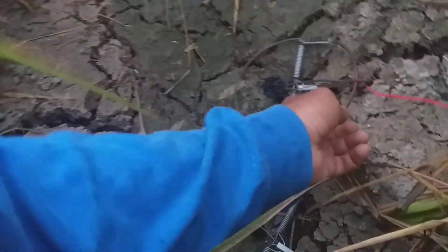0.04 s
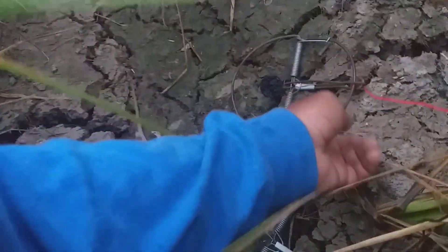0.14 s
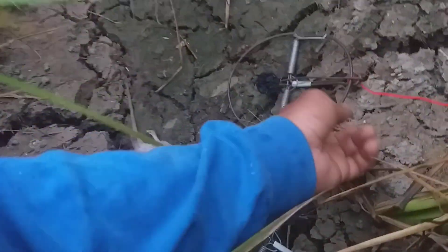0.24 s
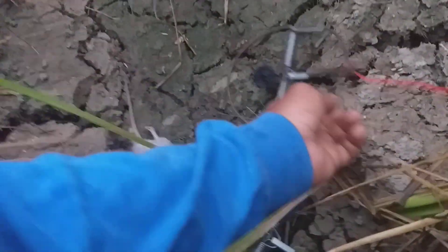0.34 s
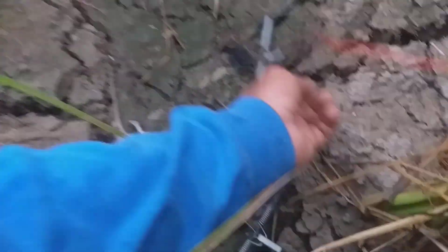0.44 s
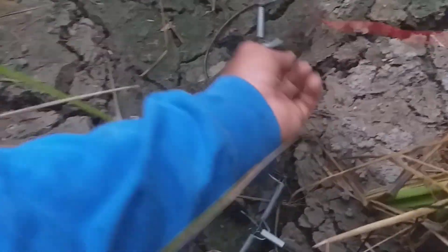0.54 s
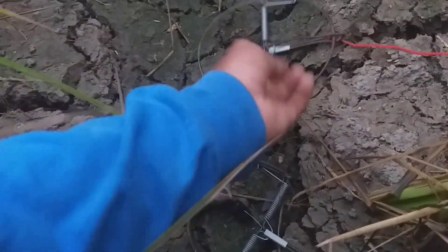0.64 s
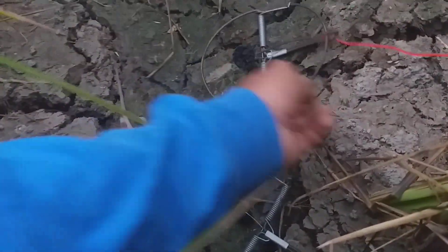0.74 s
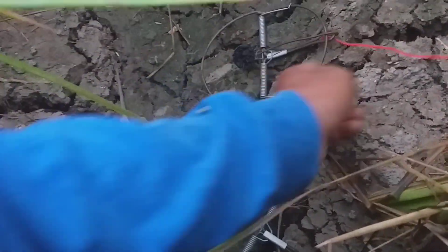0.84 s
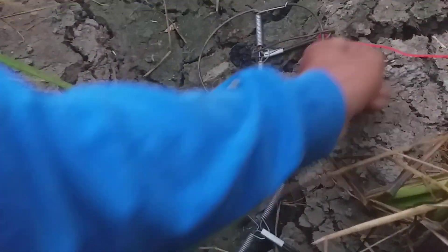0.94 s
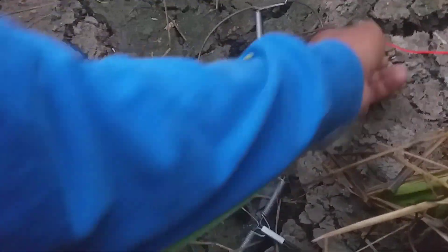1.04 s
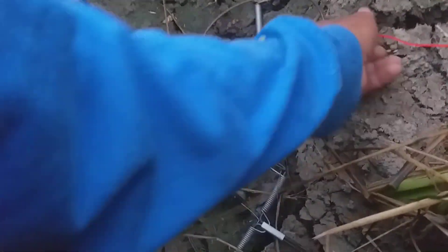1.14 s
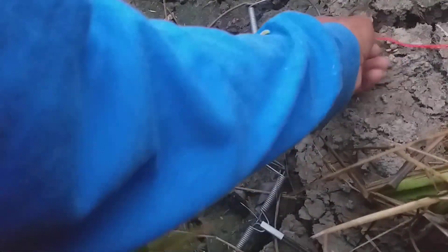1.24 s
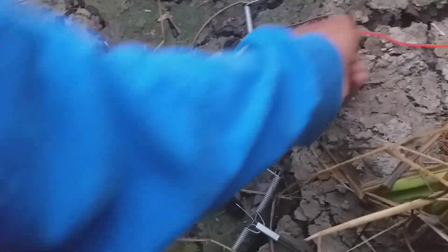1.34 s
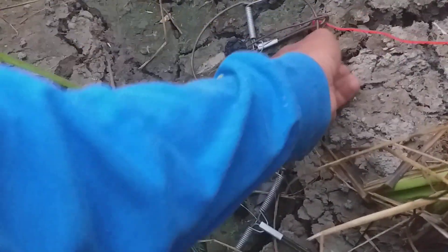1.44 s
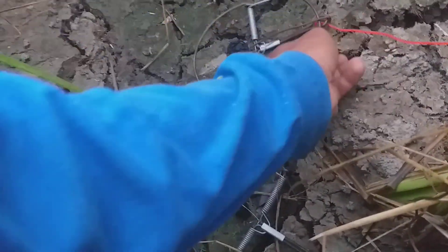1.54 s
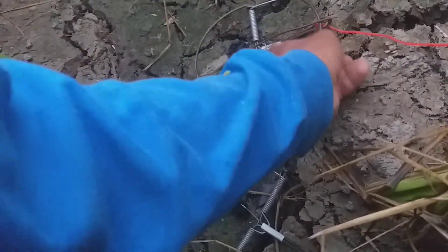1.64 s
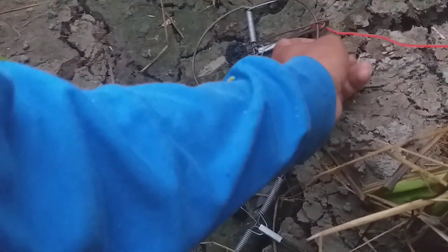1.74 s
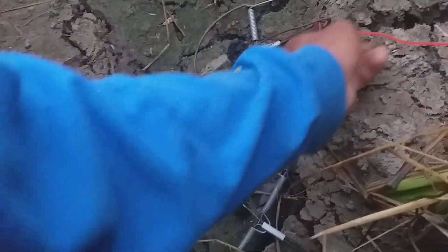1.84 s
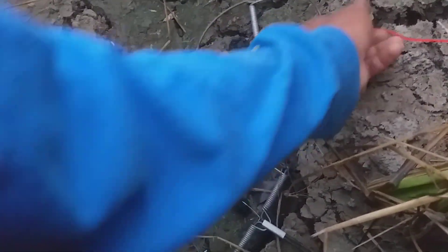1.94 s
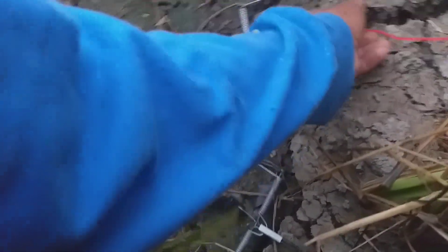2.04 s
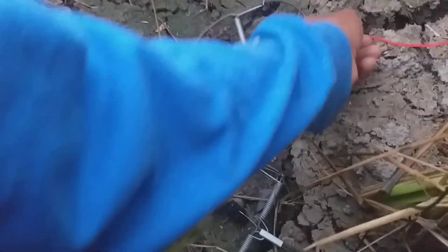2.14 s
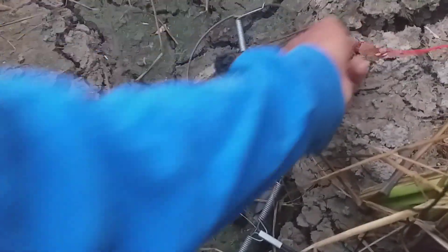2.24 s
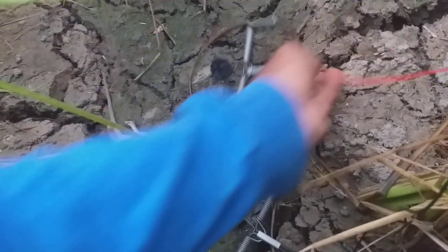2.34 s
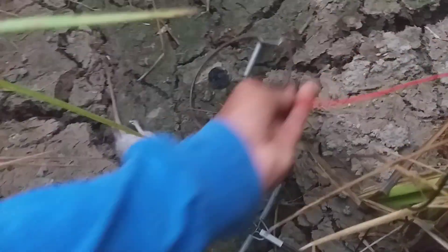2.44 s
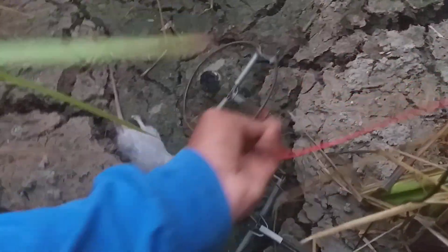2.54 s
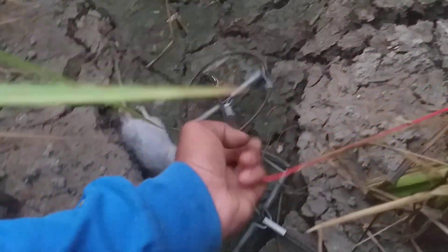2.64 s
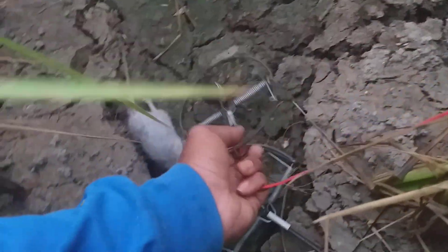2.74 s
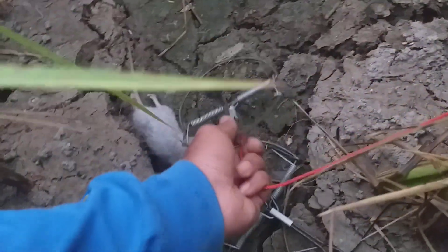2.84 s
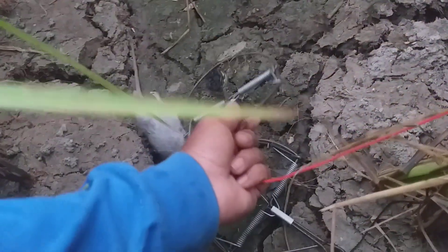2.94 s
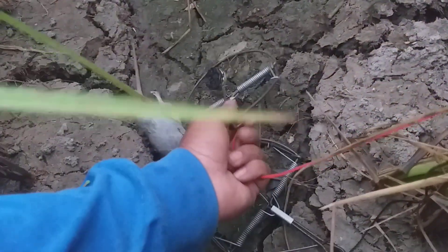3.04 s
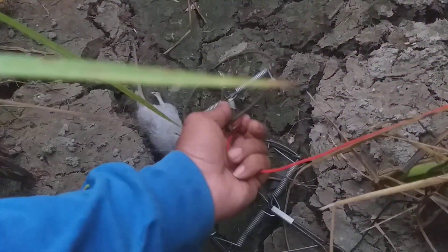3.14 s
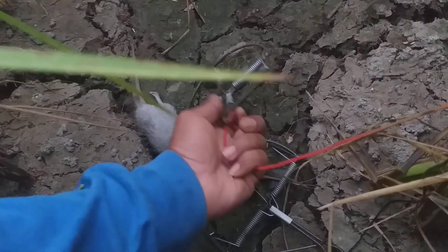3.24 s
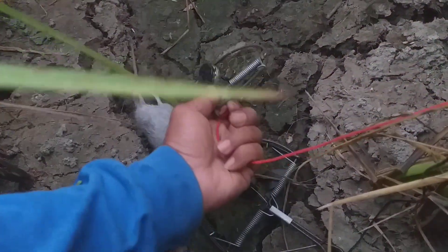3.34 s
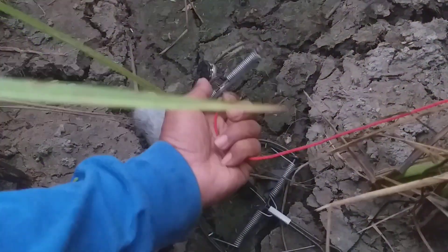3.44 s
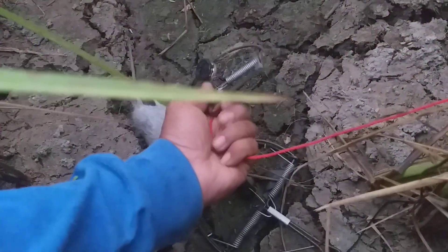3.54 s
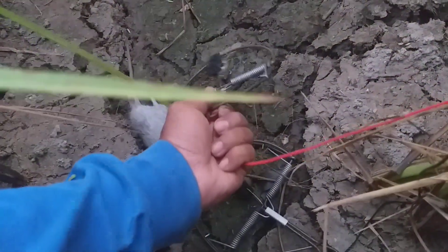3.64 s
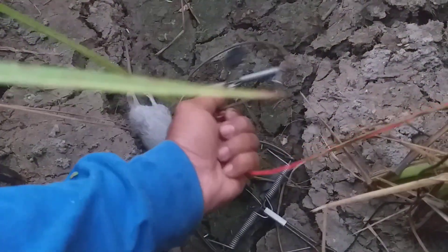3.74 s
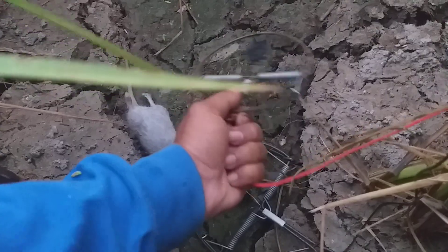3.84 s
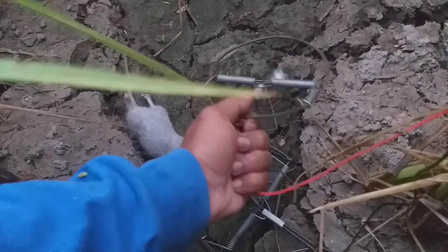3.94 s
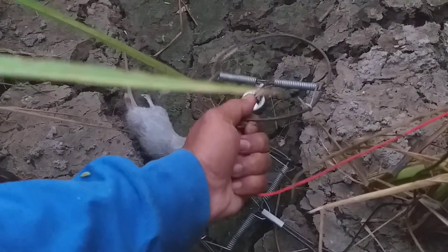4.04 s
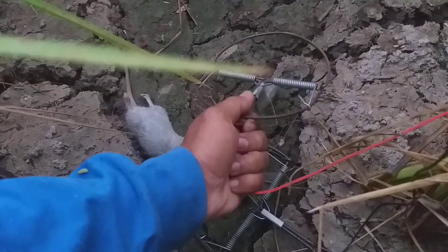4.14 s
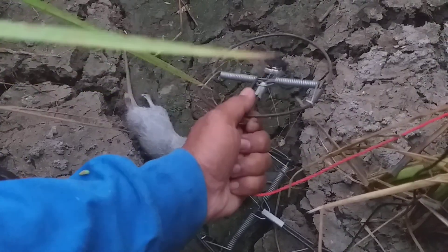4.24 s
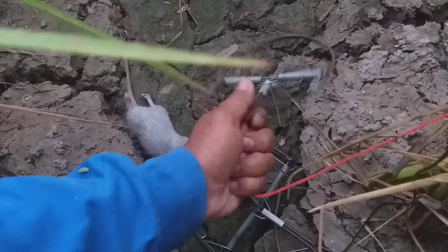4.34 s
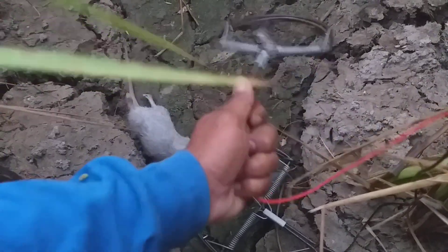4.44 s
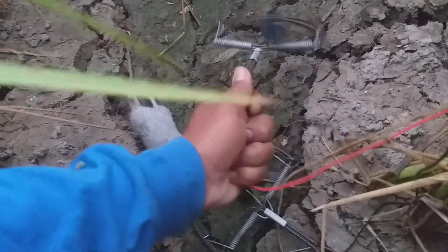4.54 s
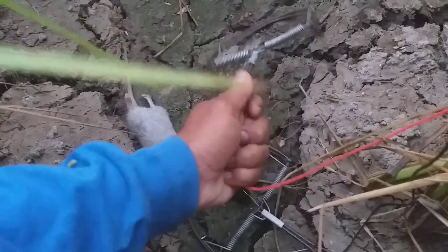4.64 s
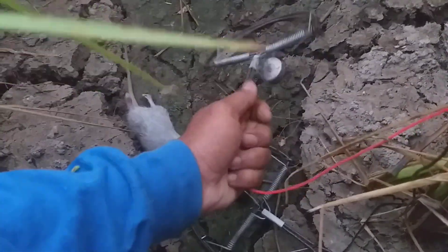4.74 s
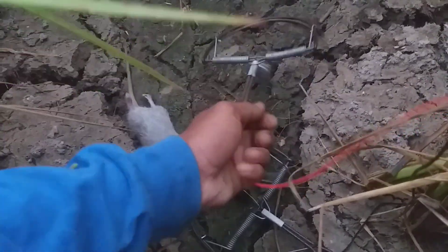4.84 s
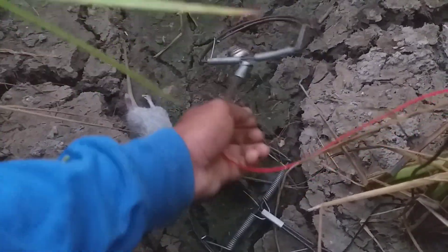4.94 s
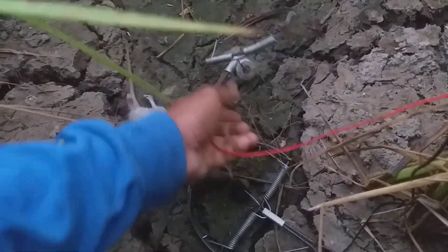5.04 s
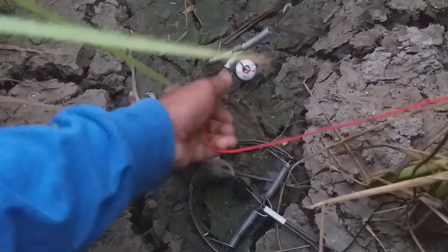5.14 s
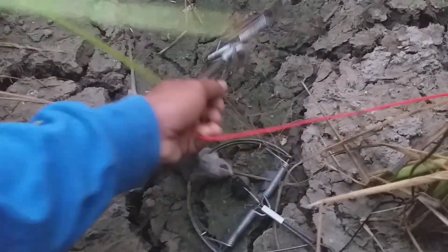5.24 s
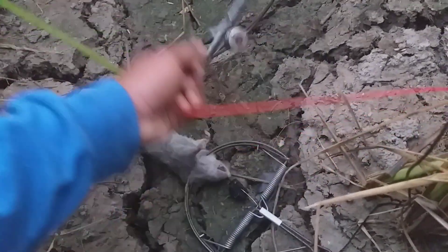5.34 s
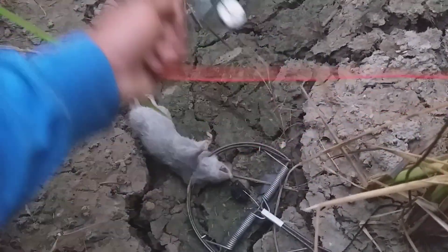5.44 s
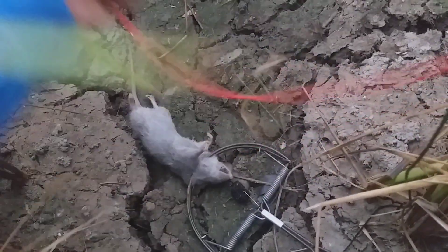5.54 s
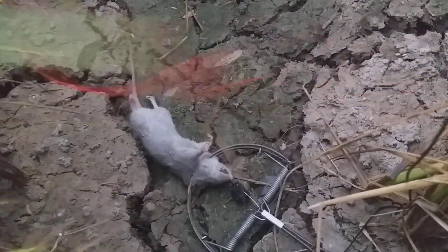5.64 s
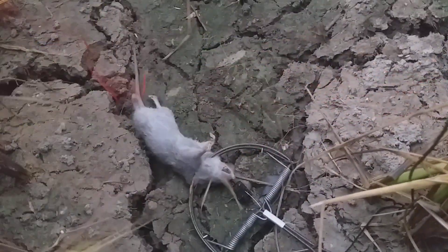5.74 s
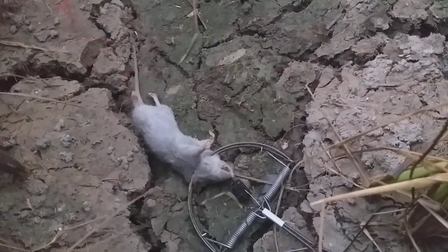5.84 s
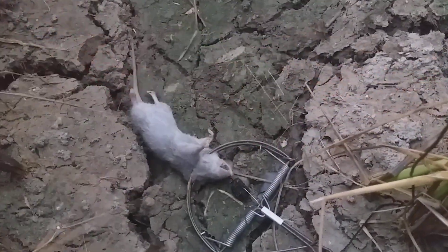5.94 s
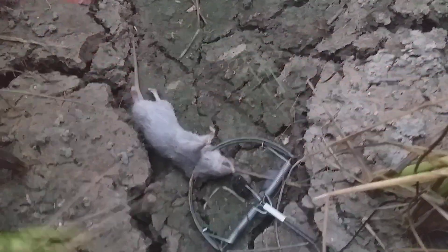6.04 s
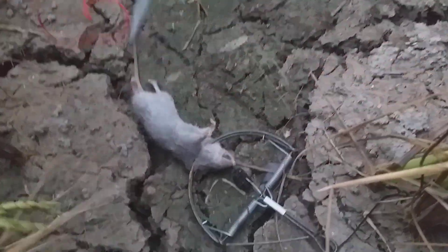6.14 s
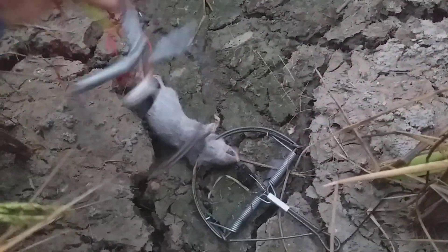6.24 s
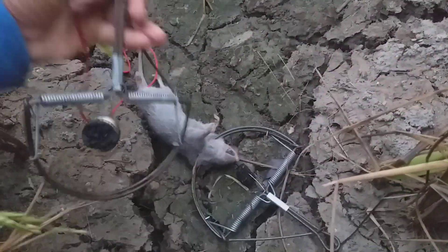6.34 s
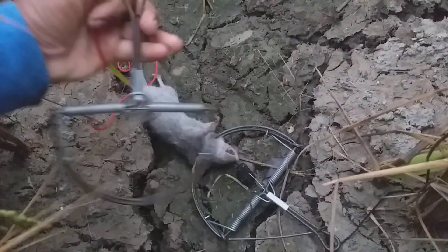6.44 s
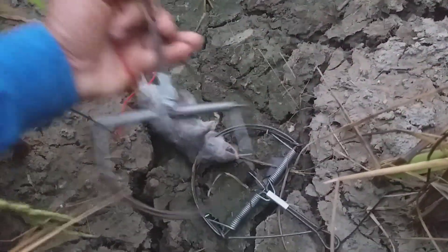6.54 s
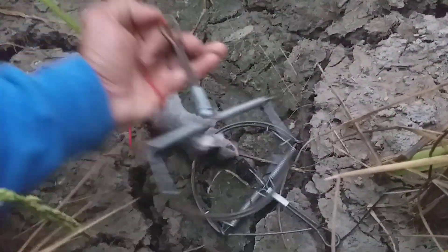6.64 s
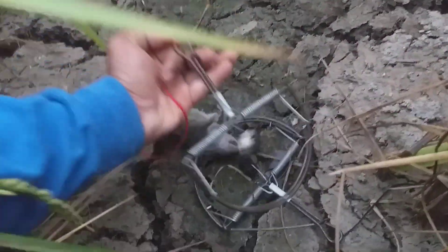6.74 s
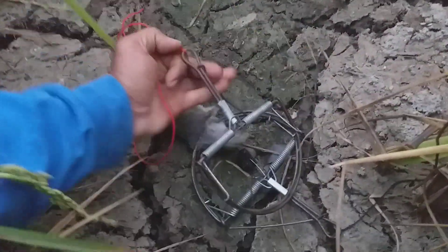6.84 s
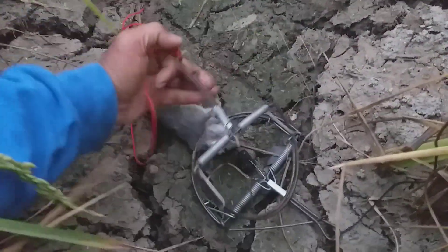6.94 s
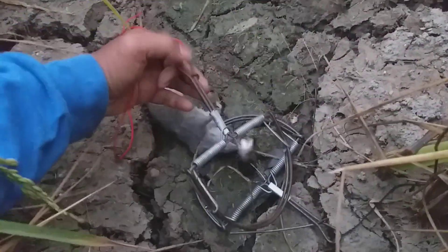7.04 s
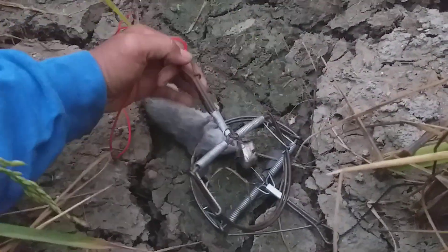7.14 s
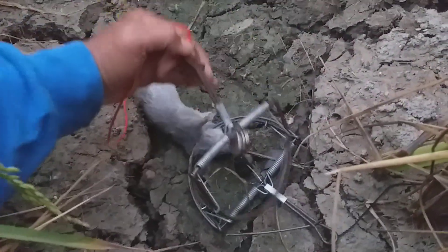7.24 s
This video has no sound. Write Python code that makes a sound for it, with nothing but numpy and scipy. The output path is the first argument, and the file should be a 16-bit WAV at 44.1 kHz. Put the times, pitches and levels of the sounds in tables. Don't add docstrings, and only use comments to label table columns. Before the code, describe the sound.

Sleeve and straw rustle over dry mud, a steel spring trap snaps once, sharp and loud, then rattles and clinks amid faint birds.

```python
import sys
import numpy as np
from scipy import signal
from scipy.fft import rfft, irfft, next_fast_len
from scipy.io import wavfile

SR = 44100
rng = np.random.default_rng(int(sys.argv[2]) if len(sys.argv) > 2 else 0)


def volts_from_decibels(level):
    exponent = np.asarray(level, float) / 20
    return 10 ** exponent


def output_pcm(signal):
    pcm = np.clip(np.atleast_2d(signal).T, -1, 1) * 32767
    wavfile.write(sys.argv[1], SR, np.round(pcm).astype(np.int16))


N = 321781
SINK_FIELD_DB = -7.5


def rms_one(x):
    return x / np.sqrt(np.mean(x ** 2) + 1e-20)


def in_time(rows):
    s, *columns = np.transpose(rows)
    return [np.interp(np.arange(N) / SR, s, c) for c in columns]


def coloured(x, points):
    size = next_fast_len(len(x), True)
    hz = np.maximum(np.arange(size // 2 + 1) * SR / size, 1)
    hz_at, db = np.transpose(points)
    weight = volts_from_decibels(np.interp(np.log(hz), np.log(hz_at), db))
    return irfft(rfft(x, size) * weight, size)[:len(x)]


def band(x, low_hz, high_hz):
    sos = signal.butter(2, [low_hz, min(high_hz, .45 * SR)], "band", fs=SR, output="sos")
    return signal.sosfilt(sos, x)


def steep_band(x, low_hz, high_hz):
    return band(band(x, low_hz, high_hz), low_hz, high_hz)


def split(x, edges_hz):
    size = next_fast_len(len(x), True)
    hz, spectrum = np.arange(size // 2 + 1) * SR / size, rfft(x, size)
    above = [1] + [1 / (1 + (edge / (hz + 1)) ** 16) for edge in edges_hz] + [0]
    return [irfft(spectrum * (a - b), size)[:len(x)] for a, b in zip(above, above[1:])]


def drift(rate_hz):
    r = np.exp(-2 * np.pi * rate_hz / SR)
    slow = signal.lfilter([1], [1, -2 * r, r * r], rng.standard_normal(N + SR))
    return rms_one(slow[SR:])


def ring(x, hz, t60):
    r, w = volts_from_decibels(-60 / (t60 * SR)), 2 * np.pi * hz / SR
    return signal.lfilter([0, np.sin(w)], [1, -2 * r * np.cos(w), r * r], x + 1e-18)


def add(out, at_s, piece):
    i = round(at_s * SR)
    out[i:i + len(piece)] += piece[:N - i]


def port_dip(x):
    sos = signal.butter(1, [8900, 11300], "bandstop", fs=SR, output="sos")
    return .25 * x + .75 * signal.sosfilt(sos, x)


def sink():
    at_s, attack_s, hold_s, release_s = 4.42, .3, 0.63, 0.71
    corners_s = np.cumsum([at_s, attack_s, hold_s, release_s])
    return in_time(np.c_[corners_s, [0, 1, 1, 0]])[0]


def open_field():
    # f/Hz, level/dB per Hz
    field_colour = [(150, -33), (250, 0.5), (710, -7), (845, -5.5), (2620, -11.5), (3230, -11), (6140, -13),
                    (7700, -17.5), (9830, -16.5), (14700, -8), (16000, -32.5)]
    field = coloured(rng.standard_normal(N), field_colour)
    level_db = -84.5 + SINK_FIELD_DB * sink() + 0.5 + 0.62 * drift(7)
    return field * volts_from_decibels(level_db) / np.std(band(field, 280, 900))


def rumble():
    # t/s, level/dB
    breeze = [(0, -68), (.35, -61.5), (.65, -68), (1.8, -66), (2.9, -68.5), (4.4, -67.5), (6., -67),
              (6.34, -59.5), (6.75, -67), (7.3, -67.5)]
    # f/Hz, level/dB per Hz
    breeze_colour = [(15, -50), (25, -23.5), (48, -5.5), (113, 1.5), (152, -2), (188, -12), (275, -23),
                     (330, -19.5), (430, -54.5), (730, -120)]
    # t/s, peak level/dB, f/Hz
    grip_shifts = [(6.097, -53, 104), (6.194, -46.5, 104), (6.26, -51.5, 86), (6.409, -48, 96.5),
                   (6.496, -53, 74.4), (6.617, -56.5, 121)]
    level_db = in_time(breeze)[0] - 8.5 * sink()
    out = volts_from_decibels(level_db + 2.2 * drift(11)) * rms_one(coloured(rng.standard_normal(N), breeze_colour))
    t = np.arange(round(.12 * SR)) / SR
    for s, db, hz in grip_shifts:
        envelope = (t / 0.013) * np.exp(1 - t / 0.01)
        add(out, s, volts_from_decibels(db + 3.5) * np.sin(2 * np.pi * hz * t) * envelope)
    return out


def cricket():
    # start t/s, end t/s, level/dB
    trill_bouts = [
        (.7, 1.35, -78),
        (1.3, 1.75, -93),
        (1.75, 2.1, -86.5),
        (2.9, 4.4, -96),
        (4.55, 4.95, -95),
        (5.6, 7.4, -88),
    ]
    carrier_hz, strokes_per_s, fall_hz, fade_s = 3220, 28., 260, 0.1
    beat = np.cumsum(strokes_per_s * (1 + .12 * drift(4))) / SR % 1
    carrier = np.sin(2 * np.pi * np.cumsum(carrier_hz + fall_hz * (.5 - beat)) / SR)
    pulses = np.sin(np.pi * beat) ** 2 * carrier
    rasp = band(rng.standard_normal(N), carrier_hz - 130, carrier_hz + 130)
    trill = rms_one(rms_one(pulses) + .8 * rms_one(rasp))
    t = np.arange(N) / SR
    bouts = sum(volts_from_decibels(db) * np.clip(np.minimum(t - a, b - t) / fade_s, .08, 1) for a, b, db in trill_bouts)
    return bouts * volts_from_decibels(3 * drift(5)) * trill


def whistle(rows, waver):
    hz, db = in_time(rows)
    t = np.arange(N) / SR
    fade = np.clip(np.minimum(t - rows[0][0], rows[-1][0] - t) / .015, 0, 1)
    return np.sqrt(2) * fade * volts_from_decibels(db) * np.sin(2 * np.pi * np.cumsum(hz * (1 + waver)) / SR)


def cuckoo():
    # t/s, length/s, low f/Hz, top f/Hz, level/dB
    calls = [
        (.8, 0.52, 1198, 1420, -85),
        (3.752, 0.51, 1197, 1395, -86),
        (4.62, 0.34, 1047, 1290, -92),
        (6.26, .51, 1215, 1413, -82),
    ]
    tune = [(0, .2), (.13, 0), (.43, .05), (.62, .47), (.755, 1), (.85, .82), (.93, .1), (1, -.5)]
    lift_db = 2.5
    out = np.zeros(N)
    for s, length, low, top, db in calls:
        rows = [(s + u * length, low + h * (top - low), db + lift_db * h) for u, h in tune]
        out += whistle(rows, waver=.004 * drift(25))
    return out * volts_from_decibels(-1.5 + 2.5 * drift(14))


def chirps():
    # t/s, f/Hz, level/dB
    phrases = [
        [(1.374, 4300, -74), (1.39, 4270, -71), (1.425, 4150, -74), (1.45, 3950, -75), (1.485, 3680, -82)],
        [(7.148, 3150, -80), (7.166, 3450, -75), (7.19, 3440, -70), (7.215, 3370, -68), (7.25, 3290, -70),
         (7.268, 3250, -76)],
        [(3.936, 6160, -66.5), (3.975, 6300, -66.5)],
        [(3.934, 12260, -80), (3.977, 12600, -80)],
        [(7.13, 12300, -84), (7.3, 15500, -84)],
        [(5.8, 1500, -74), (5.88, 1540, -74)],
        [(2.205, 985, -86), (2.26, 1050, -86), (2.33, 1240, -81), (2.375, 1225, -76), (2.42, 1260, -84)],
        [(7.15, 1120, -92), (7.22, 1180, -87), (7.25, 1250, -80), (7.31, 1350, -79)],
    ]
    out = sum(whistle(rows, waver=.004 * drift(40)) for rows in phrases)
    return out * volts_from_decibels(2.5 * drift(70))


def stroke_gains(rest_shift_db):
    # full from t/s, hold/s,
    # level/dB, edges/dB per s, dull cloth extra/dB
    strokes = [(0, 0.064, -53, 71, 2), (0.52, 0.012, -65.5, 54, 0), (0.773, .02, -67.5, 77, 3.5),
               (0.99, 0.13, -60, 80, -2), (1.161, .08, -57, 135, -2.5), (1.6, .08, -68, 90, -9),
               (2.1, 0.036, -59.5, 91, -1.5), (2.361, 0.13, -58.5, 143, 3.5), (2.6, .11, -53, 75, -1),
               (2.84, .1, -64, 140, -4), (3.11, .1, -79, 100, -12), (3.35, .04, -81, 140, -10),
               (4.09, .03, -76.5, 89, 3), (4.385, .02, -72, 500, 6), (4.52, .05, -66, 250, 5),
               (4.7, 0.095, -76.5, 60, -9), (4.958, 0.014, -78.5, 70.5, -3.5), (5.5, 0.02, -51.5, 97.5, -4),
               (5.722, 0.022, -55.5, 97, -1), (5.916, 0.081, -57, 60, 4), (6.095, .25, -60, 200, 5),
               (6.563, 0.03, -65, 58, 0), (6.717, 0.049, -61, 76, -0.5), (6.89, .03, -64, 81, -1.5),
               (7.035, 0.025, -76.5, 82, -4), (7.23, .08, -72, 160, -2), (3.092, .03, -73, 300, -14),
               (4.94, .018, -72, 300, -10)]
    scatter = (4.44, .04, -55, 120, 3)
    # offset/dB, swing per dB, share of dull extra, rest level/dB
    regions = [(-11, 0.99, 0.99, -89.5), (-0.38, 1., 0.11, -87.5), (0, 0.7451, -0.15, -86),
               (-1, 1.07, -.1, -91.5)]
    reference_db = -55
    t = np.arange(0, N, 64) / SR
    s, hold, db, edge, dull = np.transpose(strokes + [scatter])[:, :, None]
    outside_s = np.maximum(np.maximum(s - t, t - s - hold), 0)
    swing = db - reference_db - edge * outside_s
    swing[-1, t < scatter[0]] = -100
    for offset_db, slope, share, rest_db in regions:
        level_db = reference_db + offset_db + slope * swing + share * dull
        power = np.sum(volts_from_decibels(level_db) ** 2, axis=0)
        yield np.sqrt(np.interp(np.arange(N) / SR, t, power) + volts_from_decibels(rest_db + rest_shift_db) ** 2)


def rustle():
    # f/Hz, level/dB per Hz
    rustle_colour = [(900, -28), (1400, -21), (1800, -10.5), (2100, -8), (2600, -11.5), (3600, -8),
                     (5700, -6), (6600, -3.5), (7600, 5.5), (8500, 0), (9300, -17), (10200, -16.5),
                     (11800, -9), (15200, -6.5), (16000, -15.5)]
    patch_edges = [1500, 1900, 2400, 3000, 3700, 4500, 5400, 6400, 7400, 8400, 11000, 13000]
    region_edges = [2900, 6200, 9900]
    grains_per_s, uneven_db, smooth, patchy_db, colour_db = 3600.0, 3.5, 1.2, 1.1, 1.8
    sizes = volts_from_decibels(uneven_db * np.minimum(rng.exponential(1, N), 4.6)) * rng.choice([-1, 1], N)
    grains = sizes * (rng.random(N) < grains_per_s * volts_from_decibels(2.5 * drift(15)) / SR)
    rub = coloured(rms_one(grains) + smooth * rng.standard_normal(N), rustle_colour)
    rub = sum(volts_from_decibels(colour_db * drift(6)) * part for part in split(rub, patch_edges))
    gains = stroke_gains(SINK_FIELD_DB * sink() + 2.6 * drift(5))
    shared = drift(25)
    out = np.zeros(N)
    for gain, part in zip(gains, split(rub, region_edges)):
        out += gain * volts_from_decibels(patchy_db * (.5 * shared + drift(14))) * rms_one(part)
    return out


def thuds():
    # t/s, level/dB, f/Hz, t60/s
    blows = [(4.063, -62, 2300, 0.03), (4.414, -43, 217, 0.08), (4.4140, -40, 560, 0.06),
             (4.4140, -38, 800, 0.05), (4.418, -49, 330, .08), (4.4145, -25, 2400, 0.1),
             (4.4143, -29, 1100, .04), (6.809, -47.5, 1300, 0.12), (6.815, -62, 300, 0.08),
             (4.372, -64, 1000, .2), (4.388, -61, 1000, .15), (4.403, -44, 1050, .04),
             (4.453, -57, 430, .03), (4.59, -68, 880, .03), (.41, -68, 850, .06), (.48, -69, 835, .06),
             (.62, -61, 950, 0.056), (.7, -63, 900, 0.08), (6.84, -60, 1350, 0.1), (.3, -57.5, 204, 0.041)]
    out, t = np.zeros(N), np.arange(round(.2 * SR)) / SR
    for s, db, hz, t60 in blows:
        puff = rng.standard_normal(len(t)) * volts_from_decibels(-60 * t / t60)
        puff = band(band(puff, .55 * hz, 1.9 * hz), .7 * hz, 1.45 * hz)
        add(out, s, volts_from_decibels(db) * puff / np.abs(puff).max())
    return out


def ticks():
    # t/s, peak level/dB, low cut f/Hz
    clicks = [(1.8931, -52, 5000), (2.6867, -40, 3000), (2.7172, -39, 2500), (3.1799, -47, 2600),
              (3.1925, -57, 6000), (3.2035, -57, 6000), (3.3705, -53, 5000), (3.3989, -57, 6000),
              (3.427, -61, 6000), (4.4159, -4, 2500), (4.4205, -5, 4000), (4.4255, -12, 2500),
              (4.6327, -47, 6000), (4.6675, -56, 5000), (4.7902, -37, 4500), (4.8782, -34, 4300),
              (4.8985, -62, 6000), (6.2893, -34, 3500), (6.3388, -34, 2500), (6.8128, -23, 3000),
              (7.045, -56, 8000)]
    out = np.zeros(N)
    for s, db, cut_hz in clicks:
        click = signal.unit_impulse(round(.02 * SR))
        click = band(band(click, cut_hz, 19000), .8 * cut_hz, 19000)
        click = click + volts_from_decibels(-3) * ring(click, hz=7800, t60=.005)
        add(out, s, volts_from_decibels(db) * click / np.abs(click).max())
    return port_dip(out)


def pings():
    # t/s, level/dB, f/Hz, t60/s
    struck_wires = [(4.4446, -31, 4700, .007), (4.4495, -25, 4200, 0.018), (4.4595, -23, 3900, .011),
                    (4.4605, -32, 4400, .01), (4.433, -20, 14850, .04), (4.452, -38, 13300, .06),
                    (4.3367, -66, 3010, .012), (4.349, -70, 3050, .03), (4.3787, -65, 2420, .015),
                    (4.404, -36, 4250, .02), (4.516, -50, 3180, .02), (4.5625, -54, 3250, .03),
                    (4.611, -58, 3950, .02), (4.5163, -42, 4300, 0.022), (4.518, -51, 2070, 0.012),
                    (3.53, -68, 2700, .02), (4.403, -32, 3100, .025), (4.44, -36, 3100, .04),
                    (5.8885, -37, 4220, 0.036), (5.889, -41, 5780, 0.04), (6.339, -38, 13600, 0.02),
                    (4.644, -63, 11400, .09), (4.643, -66, 13400, .09), (4.643, -68, 15000, .06),
                    (4.651, -64, 3250, .04), (4.723, -64, 4700, .02), (4.984, -62, 4500, .015),
                    (4.98, -65, 3300, .012), (5.8895, -35, 7450, .035), (5.8888, -34, 11800, .018),
                    (5.896, -38, 13900, .03), (6.2885, -42, 12000, .02), (6.288, -42, 14300, .012),
                    (7.022, -64, 1230, .05), (3.515, -70, 2200, .02), (3.55, -70, 3000, .02)]
    out, t = np.zeros(N), np.arange(round(.15 * SR)) / SR
    for s, db, hz, t60 in struck_wires:
        knock = rng.standard_normal(len(t)) * np.exp(-t / 0.0011)
        tone = band(ring(knock, hz, t60), .7 * hz, 1.4 * hz)
        add(out, s, volts_from_decibels(db) * tone / np.abs(tone).max())
    return out


def decay_of(t, t60):
    return volts_from_decibels(-60 * t / t60) + volts_from_decibels(-20 - 60 * t / (3.5 * t60))


def contacts(events, gain_db, share, tune, free, rise_s):
    # f/Hz, level/dB, t60/s
    wire_modes = [(6950, -15, 0.031), (7560, -1.5, 0.048), (6950, -7.5, 0.054), (7620, 0.5, .05),
                  (7760, 5, 0.059), (8300, -13, 0.036), (11700, -19, .03), (13500, -22, .03)]
    out, t = np.zeros(N), np.arange(round(.12 * SR)) / SR
    share = np.clip(share, 0, 1)
    for s, peak_db, low_db, top_db, t60 in events:
        burst = rng.standard_normal(len(t)) * volts_from_decibels(2.4 * rng.standard_normal(len(t)))
        burst *= decay_of(t, np.clip(t60, .004, .07)) * np.minimum(t / rise_s, 1)
        chance_db = 3 * rng.standard_normal(len(wire_modes))
        bend = tune * (1 + .012 * rng.standard_normal())
        wires = np.zeros(len(t))
        for (hz, db, decay), chance in zip(wire_modes, chance_db):
            wires += volts_from_decibels(db + chance) * ring(burst, bend * hz, free * decay)
        parts = [steep_band(burst, 6700, 8500), band(wires, 5500, 16000),
                 band(burst, 3200, 6500), steep_band(burst, 10400, 18500)]
        gains = [1 - share, share, volts_from_decibels(low_db), volts_from_decibels(top_db + 2.0)]
        mix = sum(g * p / np.abs(p).max() for g, p in zip(gains, parts))
        add(out, s - .5 * rise_s, volts_from_decibels(peak_db + gain_db) * mix)
    return port_dip(out)


def jaw():
    # t/s, level/dB, push length/s, low cut f/Hz
    landing = (4.4143, -15, .00017, 150)
    # f/Hz, level/dB, t60/s
    ground = (115, -33, .05)
    s, db, length, cut_hz = landing
    ground_hz, ground_db, ground_t60 = ground
    out, t = np.zeros(N), np.arange(round(.02 * SR)) / SR / length
    add(out, s, volts_from_decibels(db) * band(t * np.exp(1 - t), cut_hz, 9000))
    boom = ring(signal.unit_impulse(round(.1 * SR)), ground_hz, ground_t60)
    add(out, s, volts_from_decibels(ground_db) * boom)
    return out


def spring_trap():
    # t/s, peak level/dB, low part/dB relative, top part/dB relative, t60/s
    cracks = [(1.8931, -49, -21, -7, 0.018), (2.1767, -41, -17, -17, 0.018), (2.625, -38, -4, -10, 0.017),
              (2.6733, -47, -12, -13, 0.018), (2.6867, -49, -2, -10, 0.018), (2.7177, -43, 2.5, -10, 0.018),
              (2.7504, -50, -1, -10, 0.018), (3.11, -51, -24, -23, 0.018), (3.1796, -56, -2, -28, 0.01),
              (3.3694, -55, -13, -27, 0.018), (4.063, -48, -7, -8, 0.018), (4.0742, -53, -16, -17, 0.018),
              (4.0843, -43.5, -13, -15, 0.018), (4.0968, -45, -14, -17, 0.018),
              (4.1869, -53, -20, -16, 0.018), (4.2664, -61, -16, -17, 0.018),
              (4.3196, -57, -18, -19, 0.018)]
    snap = [(4.390, -50, -8, -12, .04), (4.4015, -42, 0, -3, .05), (4.4045, -25, -5, -1, .07),
            (4.4105, -25, -6, -4, .04), (4.4146, -12, 2, 0, .008), (4.4155, -8, 1, -4, .01),
            (4.4172, -10, -10, -10, .016), (4.4190, -11, -12, -10, .012), (4.4203, -8, -14, 1, .007),
            (4.4222, -16, -8, -4, .016), (4.4250, -15, -1, 0, .015), (4.4278, -26, 0, -4, .025),
            (4.432, -24, -12, -3, .04), (4.437, -24, -10, 2, .025), (4.4405, -21, -10, -10, .02),
            (4.4455, -30, 0, -4, .03), (4.450, -33, -3, -4, .04), (4.4563, -30, -6, -6, .03),
            (4.466, -32, -6, -1, .04)]
    rattle = [(4.4802, -31, -11, -17, 0.016), (4.4924, -37.5, -6, -15, 0.018), (4.5165, -38, -4, -15, 0.02),
              (4.5431, -40, -14, -20, 0.03), (4.548, -40, -16, -20, .035), (4.5534, -41, -12, -20, 0.03),
              (4.563, -47, -4, -14, .02), (4.505, -47, -5, -12, .02), (4.533, -47, -3, -12, .02),
              (4.614, -50, -10, -14, .03), (4.5807, -46.5, -7, -8, 0.021), (4.59, -36.5, -17, -18, 0.018),
              (4.6405, -48, -22, -12, 0.012), (4.643, -43, -28, -20.5, 0.017), (4.6728, -43, -8, -8, 0.018),
              (4.6843, -40, -14, -8, 0.017), (4.7252, -58, -5.5, -5, 0.018), (4.7737, -45, -8, -16, 0.018),
              (4.7875, -41, -16, -10, 0.028), (4.9215, -58, -19.5, -14, 0.02),
              (4.9415, -53, -19.5, -18, 0.018), (4.9504, -54, -19.5, -20, 0.018),
              (4.9857, -59, -8, -15, 0.018)]
    clinks = [(5.447, -39, -9, -12, 0.022), (5.8888, -32, -6, -3, 0.025), (6.18, -47, -8, 0, 0.04),
              (6.2422, -41, -16, -14.5, 0.022), (6.2701, -41, -28, -16, 0.02),
              (6.2878, -22.5, -27, -19, 0.013), (6.2935, -36, -25, -20, .03), (6.3272, -31, -18, -8, 0.022),
              (6.3376, -31, -15, -5, 0.02), (6.343, -38, -12, -6, .018), (6.412, -50, -20, -20, .04),
              (6.5, -42, -20, -26, 0.022), (6.5114, -47, -26, -29, 0.022), (6.5195, -37, -31, -22, 0.025),
              (6.525, -39, -30, -29, .025), (6.531, -41, -30, -29, .03), (6.8082, -42, 0, -12, .03),
              (6.812, -24, -17, -5, 0.011), (6.8143, -24, -21, -12, .012), (6.8174, -27, -21, -10, 0.014),
              (6.8225, -41, -6, -10, .02), (6.8297, -30, -13.5, -6, 0.01), (6.8304, -26, -26, -20, .018),
              (6.8345, -37, -16, -16, .014), (6.851, -39, -12, -10, 0.02), (6.856, -44, -14, -16, .02),
              (6.8605, -43, -16, -18, .02), (6.8655, -45, -16, -18, .025),
              (6.8977, -50.5, -14.5, -11, 0.022), (7.074, -55, -16, -21, 0.022),
              (7.205, -43, -22, -24, 0.022), (5.895, -36, -8, -4, .035)]
    out = contacts(cracks, gain_db=1.5, share=0.13, tune=.99, free=.6, rise_s=.001)
    out += contacts(snap, gain_db=0.8, share=0.42, tune=1.02, free=.7, rise_s=.0005)
    out += contacts(rattle, gain_db=3.5, share=0.4, tune=.975, free=.7, rise_s=.0016)
    out += contacts(clinks, gain_db=4.0, share=0.45, tune=.965, free=.5, rise_s=.0013)
    return out + pings() + ticks() + thuds() + jaw()


def scene():
    # f/Hz, side level under mid/dB
    far_width = [(60, -33.5), (110, -34.5), (200, -25.5), (380, -17), (700, -12), (1290, -12), (2380, -5),
                 (4400, -16), (8120, -11.5), (15000, -8)]
    near_width = [(60, -52), (110, -45), (200, -44), (380, -42), (700, -36), (1290, -15), (2380, -23),
                  (4400, -45), (8120, -27), (15000, -64)]
    field, low = open_field(), rumble()
    wildlife = cuckoo() + chirps() + cricket()
    hand, trap = rustle(), spring_trap()
    scrambled = np.roll(field + low + 0.27 * hand, 211)
    side = coloured(scrambled, far_width) + np.roll(coloured(trap, near_width), 9) + .2 * np.roll(wildlife, 9)
    mid = hand + trap + wildlife + field + low
    return np.array([mid + side, mid - side])


def band_limit(x):
    return signal.sosfilt(signal.butter(12, 16820, fs=SR, output="sos"), x)


def record(dry):
    low_pass = signal.ellip(8, .3, 38, 15880, fs=SR, output="sos")
    cut = signal.sosfilt(low_pass, dry)
    mix = 1.171 * np.tanh(cut / 1.21)
    return band_limit(mix)


dry = scene()
out = record(dry)
output_pcm(out)
```